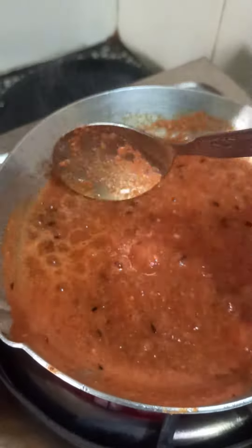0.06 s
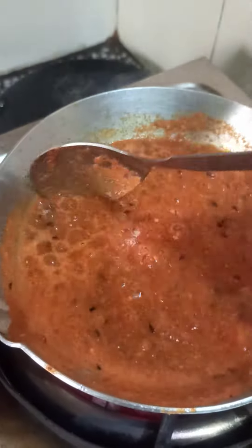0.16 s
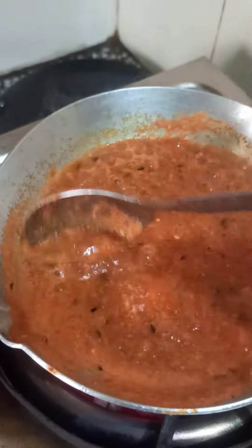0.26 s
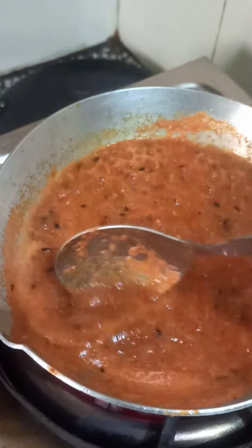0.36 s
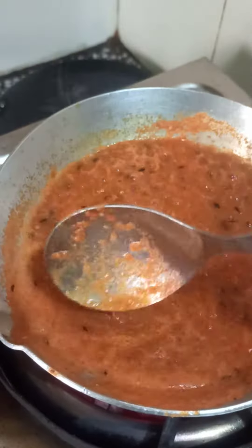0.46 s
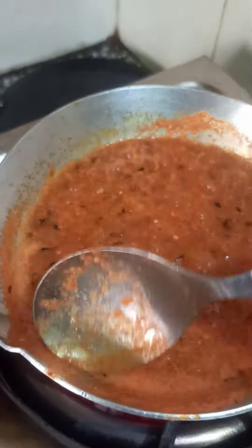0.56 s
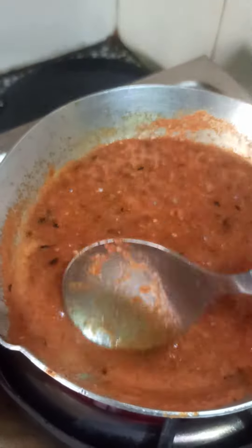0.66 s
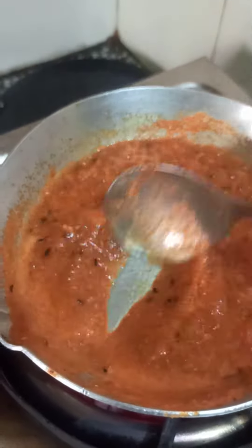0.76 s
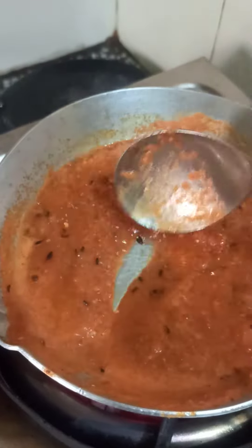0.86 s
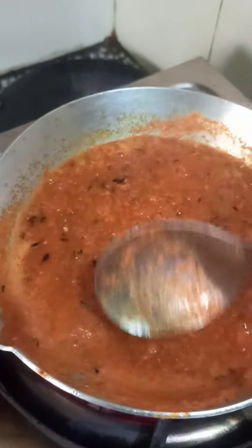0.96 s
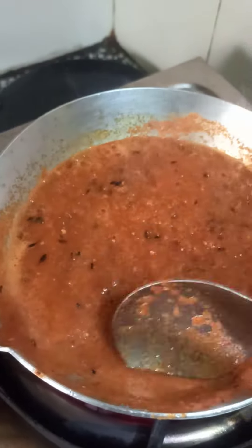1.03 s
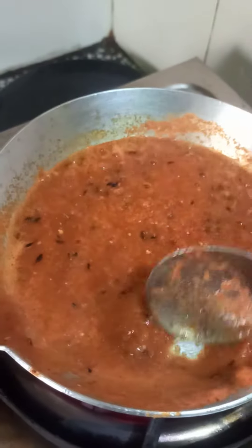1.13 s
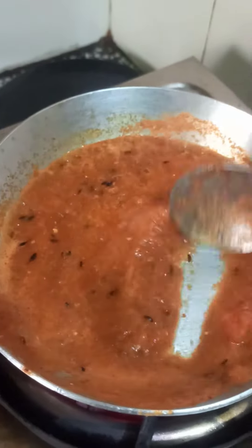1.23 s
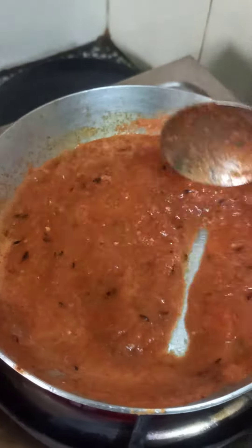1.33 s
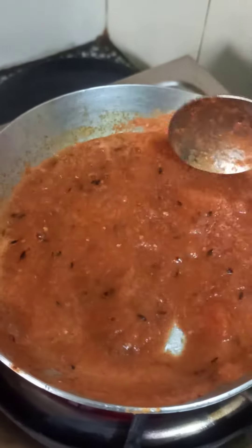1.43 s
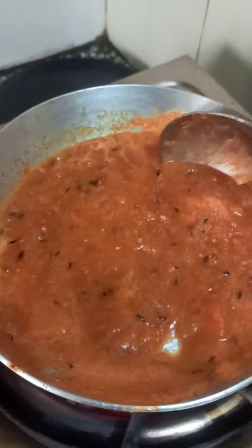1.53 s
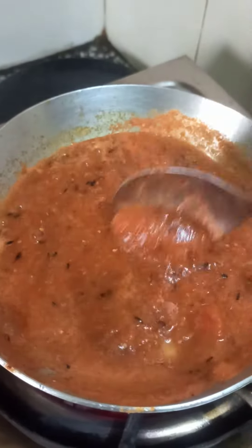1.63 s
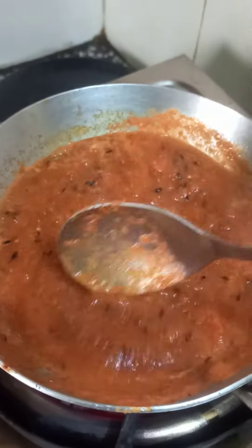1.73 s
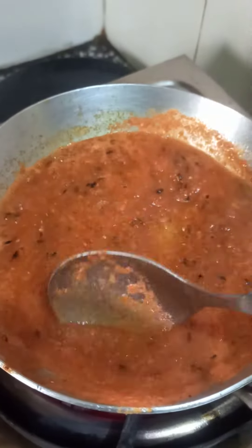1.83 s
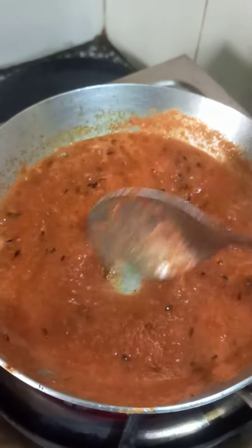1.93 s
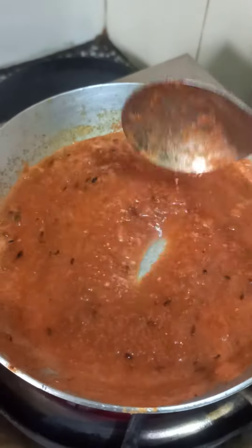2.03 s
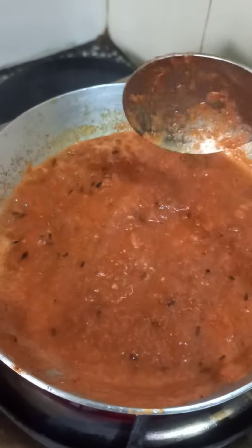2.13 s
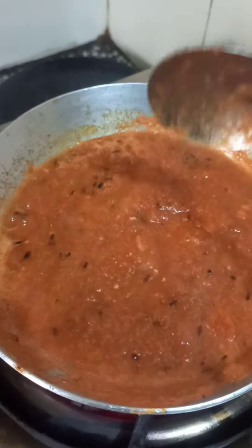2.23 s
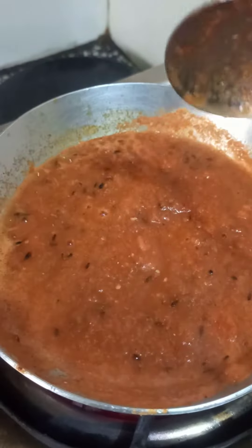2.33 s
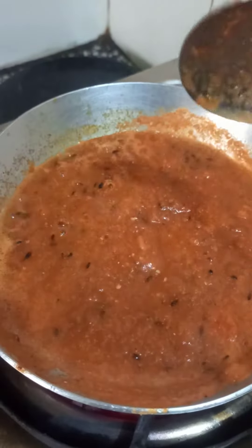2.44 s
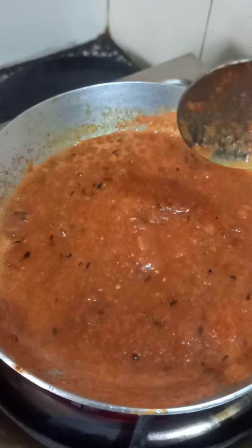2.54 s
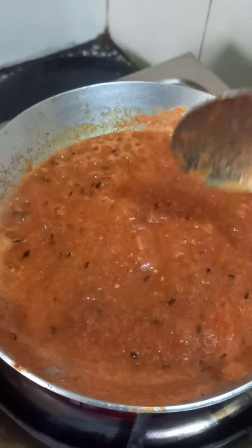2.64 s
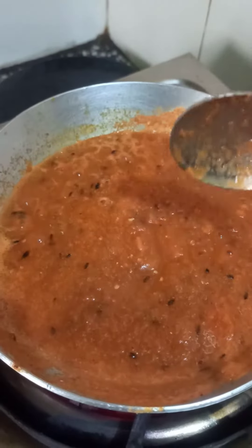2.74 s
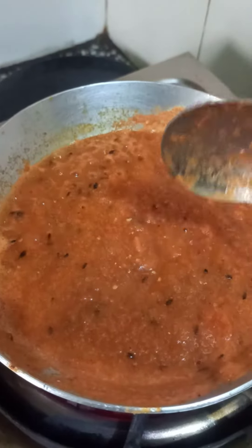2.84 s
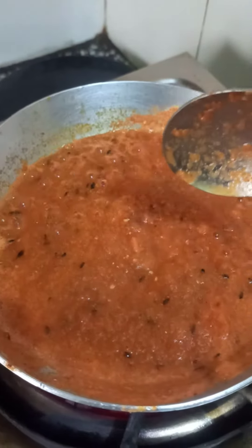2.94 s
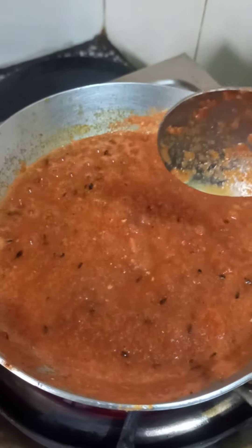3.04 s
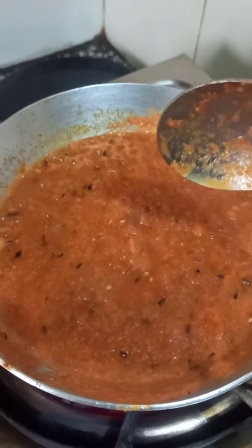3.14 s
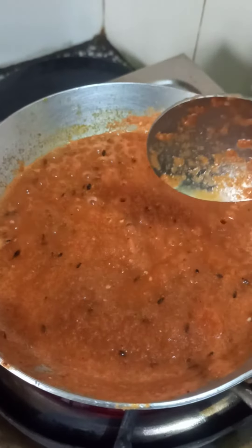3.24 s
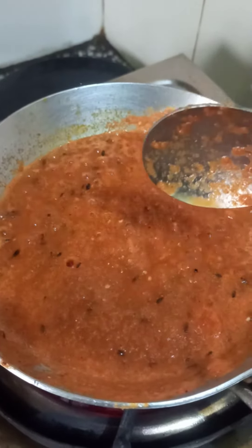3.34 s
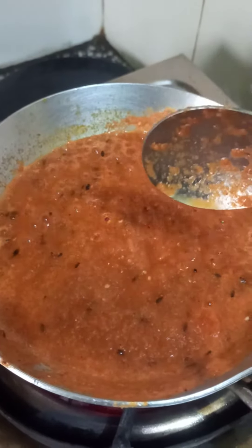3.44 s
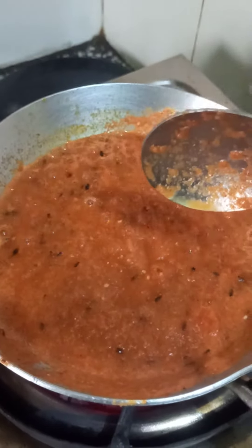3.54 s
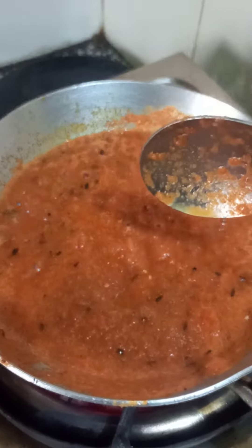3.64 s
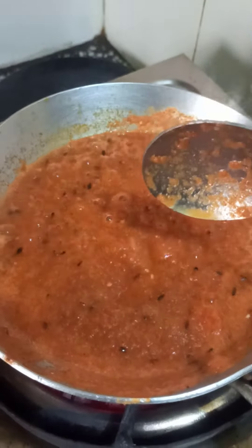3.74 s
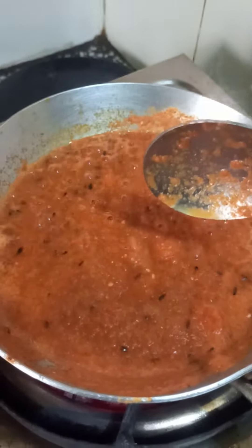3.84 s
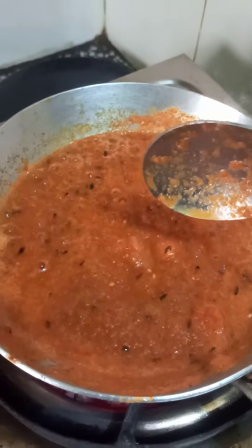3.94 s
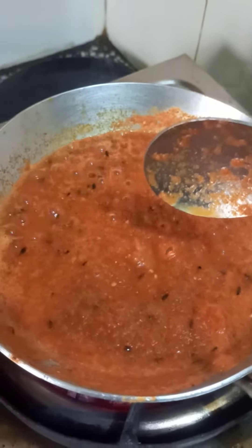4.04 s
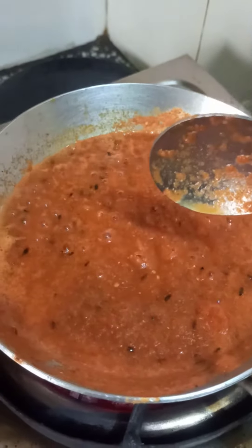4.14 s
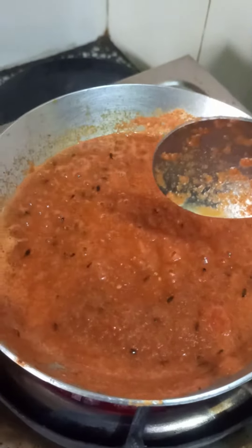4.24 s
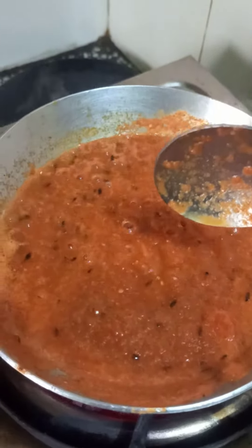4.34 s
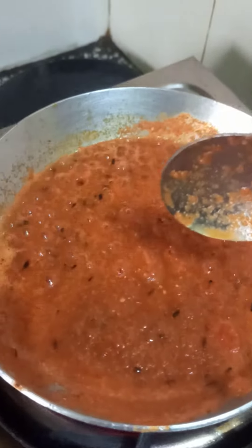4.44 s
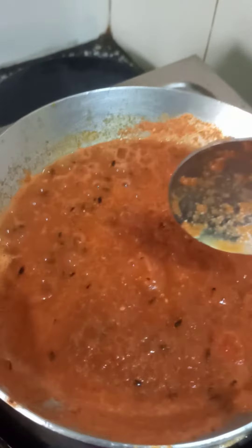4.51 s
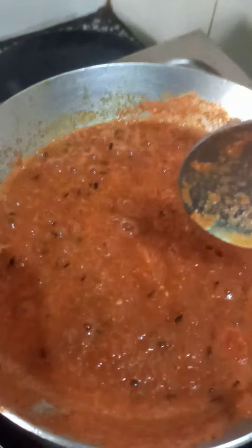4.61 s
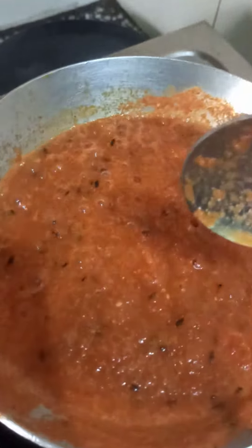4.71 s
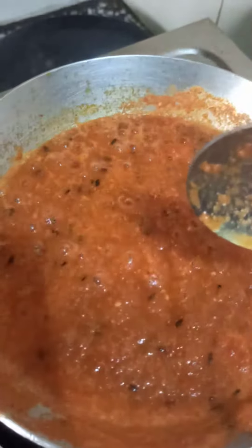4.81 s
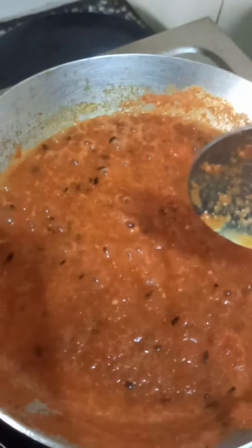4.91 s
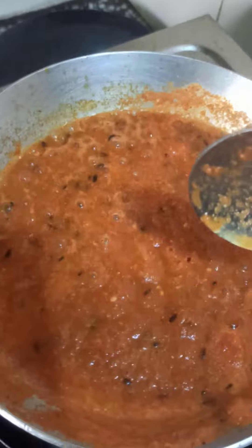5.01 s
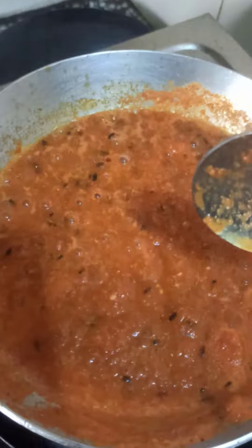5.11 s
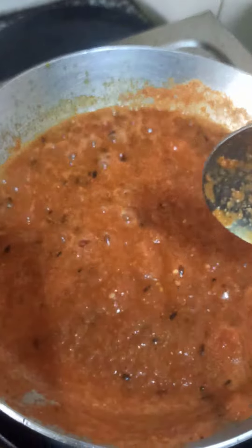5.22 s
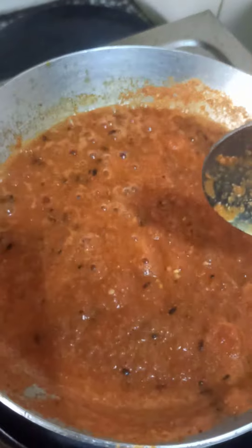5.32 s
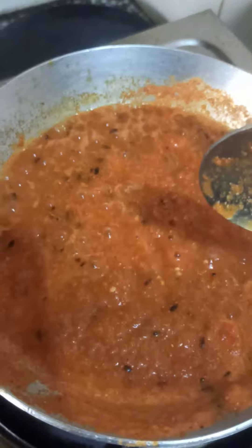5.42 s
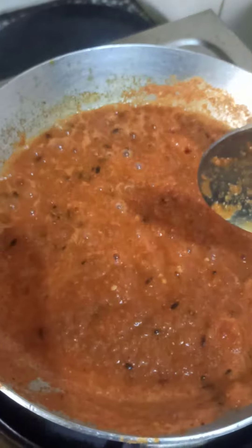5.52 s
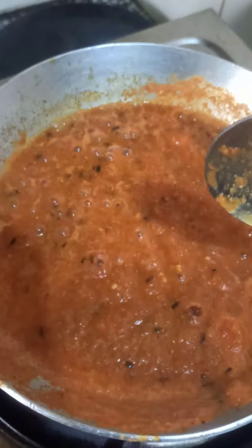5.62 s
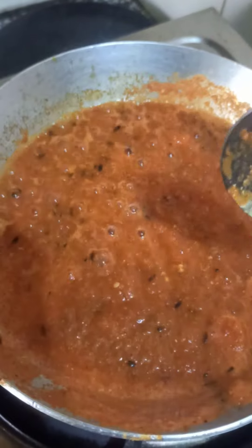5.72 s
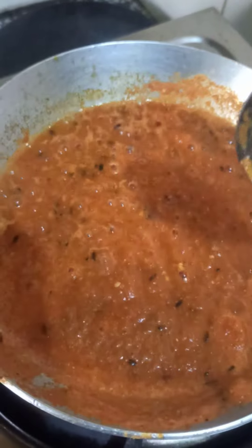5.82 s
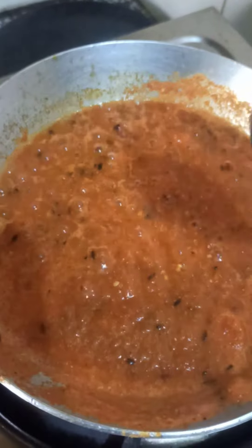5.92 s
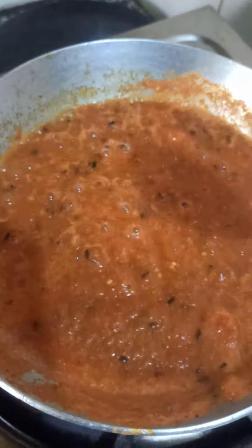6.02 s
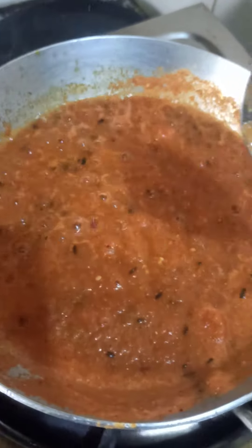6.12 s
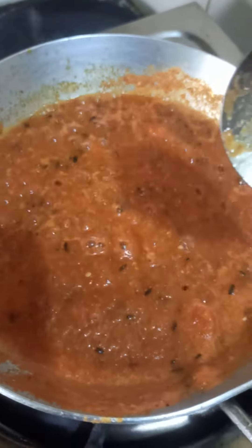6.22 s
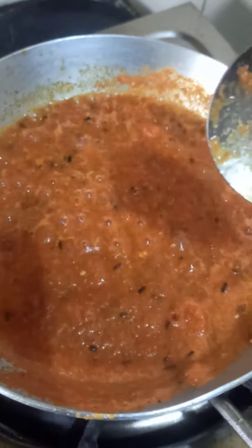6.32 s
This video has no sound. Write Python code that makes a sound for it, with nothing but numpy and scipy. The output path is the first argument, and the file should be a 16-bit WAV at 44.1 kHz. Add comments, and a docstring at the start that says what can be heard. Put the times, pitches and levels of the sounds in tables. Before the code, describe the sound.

Close, slightly wide phone pickup above a stove in a small tiled kitchen with a very short tail. From the start a soft bubbling fizz and low wavering gas flame. At about 0.1 s a dull, muffled spoon touch and a light drag through thick paste. Sharp steel clacks with hollow pan thuds follow at 0.53, 0.97, 1.43 and 1.78 s, each leading into a short gritty, bright scrape that ends abruptly; the one near 1 s cracks hardest, and the last thuds deepest. Faint low pan bumps fill the gaps. By 2 s stirring is over and the level drops far down. A thin sizzle remains with scattered snaps and tiny plops, sparse until 3 s, then steadily busier; from 4.3 to 6 s it crackles densely with brighter pops. Near the end, a faint low pan swell and a tiny spoon knock at 6.35 s.

```python
"""A steel spoon knocks in a thin pan and drags five times through thick paste: short cracks over thuds, gritty rasps.
Knocks, drags, soft low pushes and bubbles drive the pan, a bank of decaying modes.
The paste simmers: it calms, then picks up again, as dense random clicks with louder pops, a bright snap over a plop.
Below lie a gas flame, wavering coloured noise, and a tiled kitchen's short diffuse tail.
All is heard by a phone with two microphone ports held above the stove."""
import sys
import numpy as np
from scipy import signal
from scipy.fft import rfft, irfft, next_fast_len
from scipy.io import wavfile
from scipy.ndimage import uniform_filter1d

SR = 44100
rng = np.random.default_rng(int(sys.argv[2]) if len(sys.argv) > 2 else 0)


def digitize_waveform(pressure):
    """Quantize a signal to 16-bit integers and store it at the path in sys.argv[1].

    Rows of a 2-D input are taken as channels; values are limited to [-1, 1].
    """
    field = np.atleast_2d(pressure).T
    bounded = np.clip(field, -1, 1)
    quanta = np.round(bounded * 32767).astype(np.int16)
    wavfile.write(sys.argv[1], SR, quanta)


N = 280917
TIME = np.arange(N) / SR
PORT_LAG_S = 0.00012
GRIND_PER_S, GRIND_SPREAD_DB = 1500, 2.4  # slips of the spoon edge on the metal

# spoon drags over the bottom: (full pressure [s], lift [s], relative grind into pan [dB], grind lean [dB/octave],
# relative rasp [dB], rasp brightness [dB], rasp swell [dB/s], rasp fall [dB/s])
STROKE_TABLE = [(0.205, 0.27, -42, 0.5, -37, -4.5, 190, 334),
                (0.659, 0.682, -36.5, -5, -34.5, 6.5, 209, 354),
                (1.108, 1.177, -40.5, -3.5, -39, 8, 200, 503),
                (1.521, 1.561, -34, -0.5, -31, -2.5, 265, 372), (1.836, 1.881, -35, -6, -32, 0.5, 146, 349)]


def undb(db):
    """Amplitude ratio of a level in dB."""
    return 10 ** (np.asarray(db) / 20)


def unit(x):
    """Scales to rms 1 over the whole array."""
    return x / np.sqrt(np.mean(x ** 2))


def level_curve(table):
    """(time [s], level [dB]) joined by straight lines."""
    s, level_db = np.transpose(table)
    return np.interp(TIME, s, level_db)


def colour(x, points, size=2048):
    """Causal filter with the given (frequency [Hz], gain [dB]), from the folded cepstrum."""
    hz, db = np.transpose(points)
    grid_hz = np.maximum(np.arange(size // 2 + 1) * SR / size, 1)
    log_gain = np.interp(np.log(grid_hz), np.log(hz), db) * np.log(10) / 20
    cepstrum = irfft(log_gain)
    cepstrum[1:size // 2] *= 2
    cepstrum[size // 2 + 1:] = 0
    response = irfft(np.exp(rfft(cepstrum)))
    filtered = signal.fftconvolve(np.atleast_2d(x), response[None], axes=1)
    return filtered[:, :N].reshape(np.shape(x))


def tilt(x, db, pivot_hz):
    """Leans the spectrum: the part below the pivot loses db, the part above gains it."""
    low = signal.lfilter(*signal.butter(1, pivot_hz, fs=SR), x)
    return low * undb(-db) + (x - low) * undb(db)


def walk(rate_hz):
    """Random levels held 1 / rate_hz seconds and smoothed twice; rms 1."""
    hold = int(SR / rate_hz)
    steps = np.repeat(rng.standard_normal(N // hold + 1), hold)
    return unit(uniform_filter1d(uniform_filter1d(steps, hold), hold)[:N])


def grains(rate_per_s, spread_db):
    """Random clicks, a few much larger than the rest; rms 1."""
    there = rng.random(N) < rate_per_s / SR
    size = np.minimum(rng.exponential(size=N), 4.5)
    return unit(there * rng.standard_normal(N) * undb(spread_db * size))


def particles(sizes, flicker_hz):
    """Each size of particle clicks in its own band and flickers on its own."""
    out = 0
    for low_hz, high_hz, rate_per_s, spread_db, flicker_db in sizes:
        band = signal.butter(2, [low_hz, high_hz], "bandpass", fs=SR, output="sos")
        clicks = grains(rate_per_s, spread_db) * undb(flicker_db * walk(flicker_hz))
        out = out + signal.sosfilt(band, clicks)
    return out


def bursts(times_s, peak_db, hz, cycles, noisy, tail_s):
    """A few cycles that swell fast and die at each time, with a short splash of noise."""
    out, t = np.zeros(N + 4096), np.arange(2048) / SR
    noisy, cycles = np.broadcast_to(noisy, len(times_s)), np.broadcast_to(cycles, len(times_s))
    noises = rng.standard_normal((len(times_s), 2048))
    for s, db, f, turns, share, noise in zip(times_s, peak_db, hz, cycles, noisy, noises):
        age = t * f / turns
        ring = np.sin(2 * np.pi * f * t) * age * np.exp(1 - age)
        splash = share * noise * np.minimum(age, 1) * np.exp(-t / tail_s)
        out[int(s * SR):][:2048] += undb(db) * (ring + splash)
    return out[:N]


def ports(x, balance_db=0., lag_s=PORT_LAG_S):
    """The left port is nearer the pan: earlier, and coloured differently from the right."""
    # (frequency [Hz], left minus right [dB])
    port_balance = [(100, -7.5), (200, 18.5), (380, -13.5), (700, 2.5), (1290, 4), (2400, 4.5), (4400, 1.5),
                    (8100, 5.5), (15000, 1)]
    size = next_fast_len(N)
    delay = np.exp(-2j * np.pi * np.fft.rfftfreq(size, 1 / SR) * lag_s)
    late = irfft(rfft(x, size) * delay, size)[:N]
    left = colour(x, [(f, db / 2) for f, db in port_balance])
    right = colour(late, [(f, -db / 2) for f, db in port_balance])
    return np.array([left * undb(balance_db / 2), right * undb(-balance_db / 2)])


def pops(simmer_db):
    """Loud bursts and a chance scatter of smaller ones: a bright snap over a low plop."""
    # bubbles that burst louder: (time [s], relative snap [dB], relative plop [dB], plop pitch [Hz])
    loud_pops = [(2.0373, -42, -53, 506), (2.1772, -44, -74, 517), (2.401, -38.5, -48, 937),
                 (2.587, -54, -51, 880), (2.722, -45, -52, 1250), (3.369, -46, -50, 970),
                 (3.514, -44, -49, 1250), (3.649, -47, -54, 800), (3.712, -44, -68, 800),
                 (4.241, -53, -47.5, 1300), (4.434, -53, -51, 1540), (4.535, -50, -54, 1260),
                 (4.885, -48, -49, 756), (4.947, -46, -47, 1000), (4.955, -48, -49, 1300),
                 (4.967, -50, -55, 890), (3.635, -44, -49, 1110), (5.006, -51, -53, 2030),
                 (5.09, -40, -53, 870), (5.141, -45, -54, 1280), (5.247, -38, -51, 865),
                 (5.328, -43, -49, 790), (5.518, -50, -44.5, 1290), (6.007, -53, -51, 1280),
                 (6.035, -52, -51, 970), (6.068, -56, -55, 600), (6.26, -48, -47.5, 815),
                 (2.6002, -45, -49, 950), (3.08, -40, -50, 1320), (3.2181, -38, -58, 1650),
                 (3.417, -41, -53, 900), (3.4898, -44, -52, 1280), (3.6277, -41, -46, 765),
                 (4.0233, -39, -53, 1200), (4.0759, -38, -48, 990), (4.35, -39, -53.5, 516),
                 (4.4895, -39, -51, 1230), (4.6798, -38, -64, 810), (4.7743, -40, -45.5, 1330),
                 (4.8, -37, -56, 1300), (4.8434, -51, -44.5, 790), (4.8679, -38.5, -60, 510),
                 (4.931, -48, -45.5, 850), (4.9366, -40, -48, 700), (4.9851, -47, -61, 1320),
                 (5.0727, -39, -67, 875), (5.1625, -37, -47, 1310), (5.301, -35, -71, 1310),
                 (5.38, -53, -55, 1090), (5.41, -49, -49, 1290), (5.446, -49, -48, 880),
                 (5.598, -53, -46.5, 1000), (5.748, -43, -44, 1250), (5.6149, -35, -65, 797),
                 (5.6534, -36, -70, 501), (5.7748, -41, -54, 725), (5.903, -37, -61, 764),
                 (6.02, -40, -65, 794), (6.335, -38, -64, 795)]
    small_per_s, small_spread_db = 70, 1.8
    small_snap_db, small_plop_db = 2.5, -13  # offsets from the simmer, ahead of the random size
    plop_low_hz, plop_high_hz = 490, 1850
    snap_hz, snap_spread = 7580, 0.063

    when, size, low, pitch = rng.random((int(small_per_s * N / SR), 4)).T
    small_db = simmer_db[(when * N).astype(int)] - small_spread_db * np.log(1 - .93 * size)
    small_hz = plop_low_hz * (plop_high_hz / plop_low_hz) ** pitch
    small = [when * N / SR, small_db + small_snap_db, small_db + small_plop_db - 8 * low, small_hz]
    s, snap_db, plop_db, plop_hz = np.concatenate([np.transpose(loud_pops), small], axis=1)
    hz = snap_hz * (1 + snap_spread * rng.standard_normal(len(s)))
    snaps = bursts(s, snap_db, hz, 4.1, 0.89, 0.008) * undb(-6.5)
    plops = bursts(s, plop_db, plop_hz, 1.22, .3, 0.0055)
    return snaps, plops


def paste():
    """Steam bubbles of all sizes burst by the thousand, near and far side; they also drum on the pan."""
    # simmer, ahead of the air and drum gains: (time [s], level [dB])
    simmer = [(0.0, -47), (0.5, -51), (0.8, -56), (2.05, -57.5), (2.64, -56), (4.45, -53.5), (5.18, -51.5),
              (6.37, -51.5)]
    # bubble sizes: (lowest [Hz], highest [Hz], bursts [1/s], size spread [dB], flicker [dB])
    bubble_sizes = [(100, 1000, 800, 2.2, 1.2), (1000, 3000, 1400, 2.5, 1.2), (3000, 9500, 2500, 3.0, 1.8),
                    (9500, 18000, 2200, 3.3, 1.8)]
    # colour of the bursts: (frequency [Hz], gain [dB])
    fizz = [(200, -20), (400, -18), (780, -1), (1050, -7.5), (1300, 0), (2050, -4), (2800, -8.5),
            (4600, -3.5), (7500, -3.5), (13000, 4.5)]
    drum_per_s, drum_spread_db = 1500, 2.2

    simmer_db = level_curve(simmer)
    boil = undb(simmer_db + .9 * walk(45) + .5 * walk(5))
    air = 0
    for lag_s in (.00018, .00027):
        side = colour(particles(bubble_sizes, 40) * boil, fizz) * undb(3.0)
        air = air + ports(side, 0., lag_s)
    snaps, plops = pops(simmer_db)
    drumming = grains(drum_per_s, drum_spread_db) * boil * undb(-39.0)
    plop_push = np.abs(plops) * undb(-33.5)
    return air + ports(snaps + plops), drumming + plop_push


def soft_pushes(hz):
    """Soft low pushes into the pan, most during the drags, the last four a low swell near 165 Hz."""
    # (time [s], relative push [dB], favoured pitch [Hz])
    push_table = [(.064, -32, 330), (.073, -24, 215), (.087, -29, 440), (.105, -28.5, 416),
                  (0.116, -45, 320), (.16, -41, 440), (.189, -34, 480), (.228, -37, 430), (.251, -35, 440),
                  (.282, -35.5, 435), (.537, -31, 435), (.546, -23, 440), (.558, -17.5, 363),
                  (0.568, -24, 395), (.583, -25, 430), (.604, -21, 695), (.618, -16, 403), (.628, -19, 435),
                  (.642, -23.5, 328), (.727, -35.5, 398), (.984, -28, 440), (.992, -19.5, 435),
                  (1.002, -27, 446), (1.024, -21, 338), (1.015, -23, 332), (1.046, -31, 328),
                  (1.075, -29, 435), (1.098, -27, 435), (1.123, -27, 437), (1.135, -32, 435),
                  (1.158, -32.5, 435), (1.191, -33, 435), (1.478, -21.5, 352), (1.502, -28, 410),
                  (1.52, -23.5, 423), (1.53, -29, 396.3), (1.57, -23, 346), (1.607, -40, 338),
                  (1.671, -36.5, 350), (1.791, -17, 416), (1.8, -33, 90), (1.803, -25, 435),
                  (1.824, -27, 400), (1.844, -24, 427), (1.889, -28.5, 436), (1.927, -32.5, 360),
                  (1.998, -44, 363), (2.021, -41.5, 335), (6.12, -35, 165), (6.2, -35, 165),
                  (6.315, -33, 165), (6.34, -31, 166)]
    push_s, loss_db_per_octave = 0.0009, 30.5  # loss away from the favoured pitch
    s, db, pitch_hz = np.transpose(push_table)
    force = np.zeros(N)
    force[(s * SR).astype(int)] = undb(db - loss_db_per_octave * np.abs(np.log2(hz / pitch_hz)))
    push = signal.windows.hann(int(push_s * SR))
    return np.convolve(force, push / push.sum())[:N]


def pan(force, lean_db_per_octave):
    """Decaying modes: the contact place sets each mode's force; each has its own port balance."""
    # (frequency [Hz], gain [dB], full t60 [s], left minus right [dB])
    pan_modes = [(91.6, -23.5, .3, 4), (163.7, -20, 0.55, 0.5), (217.5, -16, 0.14, 9),
                 (317.2, -9, 0.3, 12.5), (308.5, -4, 0.091, -14), (350.7, -6.5, 0.25, -15.5),
                 (398.6, -2.5, 0.071, 7), (436.2, 3, 0.17, -2.5), (438, -2.5, 0.087, -3),
                 (470, -6, 0.065, -18.5), (528, -6.5, 0.14, 1.5), (602, -8.5, 0.054, 18.5),
                 (755, -6, 0.099, 4), (827, -3.5, 0.049, 1), (946, 1, 0.046, 1), (1006, -3.5, 0.038, 8.5),
                 (1249, -5, 0.033, 8), (1214, -15, 0.02, 21), (1410, -38, 0.013, 8), (1770, -23.5, 0.23, 2),
                 (2038, -6, 0.04, -11.5), (2410, -7, 0.0065, -21.5)]
    pushed_ring, pushed_db = 0.46, 2.5  # soft pushes ring for this share of the full t60

    out = np.zeros((2, N))
    for k, (hz, db, t60_s, balance_db) in enumerate(pan_modes):
        pole = np.exp(2j * np.pi * hz / SR - np.log(1000) / (t60_s * SR))
        octaves = np.clip(np.log2(hz / 380), -1, 1)
        share = undb(lean_db_per_octave * octaves + 2.2 * walk(20))
        struck = signal.lfilter([1], [1, -pole], force * share)
        short_pole = pole * np.abs(pole) ** (1 / pushed_ring - 1)
        pushed = signal.lfilter([1], [1, -short_pole], soft_pushes(hz)) * undb(pushed_db)
        ring = (struck + pushed) * (-1) ** k  # neighbouring modes move in opposite senses
        lag = np.exp(-2j * np.pi * hz * PORT_LAG_S)
        left, right = undb(balance_db / 2) * ring.imag, undb(-balance_db / 2) * (ring * lag).imag
        out += undb(db) * np.array([left, right])
    return signal.lfilter(*signal.butter(2, 80, "high", fs=SR), out)  # a small pan radiates no deep bass


def flame():
    """Gas flame and room rumble: a low wavering roar, partly alike at both ports."""
    # ahead of a fixed gain: (time [s], level [dB])
    flame_level = [(0.0, -57), (2.2, -60), (6.0, -60.5), (6.37, -56)]
    # (frequency [Hz], gain [dB])
    roar = [(30, -4), (55, -8), (90, 9), (130, 6), (200, 1.5), (320, 1.5), (500, -8), (1000, -15),
            (4000, -20.5)]
    mid, side = unit(colour(rng.standard_normal((2, N)), roar))
    gain = undb(level_curve(flame_level) + 2.0 + 0.32 * walk(26.0))
    return gain * np.array([0.87 * (mid + 0.91 * side), mid - 0.25 * side])


def kitchen(x):
    """Tiles and worktop return a short diffuse tail, thin in the bass, unrelated at the two ports."""
    t60_s, tail_db = 0.17, -6.5
    t = np.arange(SR // 2) / SR
    decay = np.exp(-np.log(1000) * t / t60_s) * (t > .0015)
    tail = rng.standard_normal((2, len(t))) * decay
    tail = signal.lfilter(*signal.butter(1, 900, "high", fs=SR), tail)
    tail /= np.sqrt(np.sum(tail ** 2, axis=1, keepdims=True))
    return undb(tail_db) * signal.fftconvolve(x, tail, axes=1)[:, :N]


def pressure(swell_db_s, fall_db_s, peak_db):
    """One gain row a stroke: rises to full pressure, holds, falls after the lift."""
    full_s, lift_s = np.transpose(STROKE_TABLE)[:2, :, None]
    rise_db = swell_db_s * np.maximum(full_s - TIME, 0)
    fall_db = fall_db_s * np.maximum(TIME - lift_s, 0)
    return undb(peak_db[:, None] - rise_db - fall_db)


def bowl(x):
    """The rasp rings the spoon bowl; each resonance comes and goes as grip and angle change."""
    # (frequency [Hz], width [Hz], relative level [dB])
    bowl_modes = [(1207, 47, 5), (3880, 140, -6), (4500, 400, -18.5), (5640, 89, -11), (6530, 23, 6.5),
                  (7200, 51, 0.5), (7380, 130, 8.5), (7950, 91, -10.5)]
    ring = 0
    for hz, width_hz, db in bowl_modes:
        grip = undb(db + 4.5 * walk(11.4))
        ring = ring + grip * signal.lfilter(*signal.iirpeak(hz, hz / width_hz, fs=SR), x)
    return x + undb(-10) * unit(ring)


def sliding(hz):
    """Grit in a band, 175 Hz wide, whose centre follows hz."""
    low = signal.butter(2, 175 / 2, fs=SR)
    a, b = (signal.lfilter(*low, grains(GRIND_PER_S, GRIND_SPREAD_DB)) for _ in range(2))
    carrier = np.exp(2j * np.pi * np.cumsum(hz) / SR)
    return unit(((a + 1j * b) * carrier).real)


def spoon():
    """Knocks crack and thud, drags chatter; returns sound in the air, force on the pan and its lean."""
    # landings: (first touch [s], relative crack [dB], crack pitch [Hz], crack length [cycles],
    # relative thud into pan [dB], thud lean [dB/octave], left minus right ahead of an offset [dB],
    # clatter share [0-1], relative skid into pan [dB], skid lean [dB/octave])
    knocks = [(0.062, -46, 900, 0.36, -32.5, -12, -17, 0.4, -29.5, -6),
              (0.097, -49, 2140, 0.5, -39, -12, -5, 0.35, -38, -12.5),
              (0.427, -48, 1800, 0.43, -46, 0.5, -23.5, 0.4, -54, -3),
              (0.529, -3.5, 3740, 0.26, -31, 6.5, 7, 0.22, -25, 0.5),
              (0.602, -17.5, 780, 0.72, -27.5, 0, 1.5, 0.83, -30, 1.5),
              (0.974, -1.5, 3820, 0.6, -25.5, .6, -3, 0, -24.5, 2),
              (1.028, -20, 2950, 0.22, -59, 7, -3, 0.66, -30, -1),
              (1.287, -45.5, 1730, .4, -61, -1, -8, 0.8, -47, -12),
              (1.297, -53, 1500, 0.35, -50, -5, -6, 0.7, -51.5, -11),
              (1.434, -16, 1170, 0.41, -25.5, 2.5, 2, 0.42, -32, 3),
              (1.783, -8, 4150, 0.28, -18.5, -1.5, 1.5, 0.73, -25.5, 0.5),
              (6.355, -39.5, 1500, 0.35, -52.5, 7, -4, 0.9, -53, -5)]
    # grit, coarse to fine: (lowest [Hz], highest [Hz], slips [1/s], size spread [dB], flicker [dB])
    grit_sizes = [(202, 1190, 1800, 2.4, 2.5), (1190, 2800, 2200, 3.0, 3.0), (2800, 6000, 2500, 3.2, 2.8),
                  (6000, 16000, 3000, 3.2, 2.2)]
    # (frequency [Hz], gain [dB])
    rasp_colour = [(300, -12), (700, -6), (1300, -1.5), (2000, 1), (2900, -6.5), (3800, -5), (5000, 3),
                   (7000, -7), (13000, -1.5)]
    # bands that slide as the spoon turns, one row a stroke, three bands in turn:
    # (centre at full pressure [Hz], centre at lift [Hz], level over the rasp drive [dB])
    scrape = [(1100, 1100, -8.5, 2200, 2000, -21, 500, 480, -12),
              (1720, 1650, -5.5, 2300, 2350, -11, 10000, 7200, -9),
              (2065, 2100, -4, 3800, 2800, -10, 8200, 6750, -15),
              (1248, 870, -5, 1900, 1850, -9.5, 1000, 1100, -6.5),
              (1220, 1000, -5, 1900, 2200, -12.5, 8200, 7000, -14)]
    contact_s = .0017  # first touch to crack
    skid_rise_s, skid_fall_db_s = 0.011, 196
    skid_rasp_db, skid_rasp_fall_db_s, skid_bright_db = -11.5, 852, 0.84
    grind_swell_db_s, grind_fall_db_s = 84, 182
    settle_s = 0.09  # a drag starts dull and bites as the pressure builds
    lifted_lean = -4.5  # dB/octave, near the dull middle of the pan
    thump_hz, thump_db = 70, 18

    (s, crack_db, crack_hz, cycles, thud_db, thud_lean,
     balance_db, clatter, skid_db, skid_lean) = np.transpose(knocks)
    (full_s, lift_s, grind_db, grind_lean,
     rasp_db, bright_db, swell_db_s, fall_db_s) = np.transpose(STROKE_TABLE)

    # skid after each knock
    last = np.clip(np.searchsorted(s, TIME) - 1, 0, None)
    since = TIME - s[last] - contact_s
    skid = np.clip(since / skid_rise_s, 0, 1) * undb(skid_db[last] - skid_fall_db_s * since)
    skid_rasp = (since > 0) * undb(crack_db[last] + skid_rasp_db - skid_rasp_fall_db_s * since)

    # a drag starts at a landing
    down = np.array([s[s < f].max() for f in full_s])[:, None] < TIME
    drags = down * pressure(grind_swell_db_s, grind_fall_db_s, grind_db)
    drag_rasp = (down * pressure(swell_db_s[:, None], fall_db_s[:, None], rasp_db)).sum(axis=0)
    stroke = drags.argmax(axis=0)
    drag = drags.sum(axis=0)

    # lean of the force over the pan modes
    drag_lean = np.where(TIME > lift_s[stroke] + .03, lifted_lean, grind_lean[stroke])
    unsettled = np.clip((full_s[stroke] - TIME) / settle_s, 0, 1)
    drag_lean = drag_lean + (lifted_lean - drag_lean) * unsettled
    lean = np.where(skid > drag, skid_lean[last], drag_lean) * (skid + drag > undb(-62))
    lean = np.where((since < contact_s) & (TIME > s[0]), thud_lean[last], lean)

    # the edge touches in two places, heard from slightly different angles
    turned = np.clip((TIME - full_s[stroke]) / (lift_s - full_s)[stroke], -1, 1.5)
    bands = np.reshape(scrape, (-1, 3, 3))[stroke].T
    bright = np.where(skid_rasp > drag_rasp, skid_bright_db, bright_db[stroke])
    chatter = undb(1.3 * walk(60) + 2.0 * walk(350))  # uneven stick and slip
    rasp = 0
    for lag_s in (.00008, .00030):
        grit = bowl(unit(colour(particles(grit_sizes, 30.0), rasp_colour)))
        edge = tilt(grit, bright, 1700) * np.hypot(skid_rasp, drag_rasp)
        for start_hz, end_hz, db in zip(*bands):
            edge = edge + sliding(start_hz + (end_hz - start_hz) * turned) * undb(db) * drag_rasp
        rasp = rasp + ports(edge * chatter * undb(-5.5), -2.5, lag_s)

    crack = bursts(s + contact_s, crack_db, crack_hz, np.maximum(cycles, .2), clatter, 0.0026)
    crack = signal.lfilter(*signal.butter(2, 220, "high", fs=SR), crack)
    side_db = balance_db[np.clip(np.searchsorted(s, TIME + .005) - 1, 0, None)]

    blows = np.zeros(N + SR)
    blows[((s + contact_s) * SR).astype(int)] = undb(thud_db)
    blows = np.convolve(blows, signal.windows.hann(16))[:N] * undb(-19.5)  # a short hard push
    grind = grains(GRIND_PER_S, GRIND_SPREAD_DB) * chatter * np.hypot(skid, drag) * undb(-29.0)

    # each landing also shakes the stove
    thump = signal.lfilter(*signal.butter(2, thump_hz, fs=SR), blows)
    thump = thump * undb(thump_db + np.array([[2.5], [-2.5]]))
    return ports(crack, side_db + 1.0, .00004) + rasp + thump, blows + grind, lean


def scene():
    """Spoon, paste and pan with their kitchen tail, over the flame."""
    steel, spoon_force, lean = spoon()
    bubbles, drumming = paste()
    near = steel + bubbles + pan(spoon_force + drumming, lean)
    return near + kitchen(near) + flame()


def record(dry):
    """Overall tone: a lift near 6.5 kHz, a deep gap from 9 to 11.5 kHz, rounded peaks, then a steep top cut."""
    # weak deep bass, a dip, a lift, a deep gap: (frequency [Hz], gain [dB])
    overall_tone = [(20, -16), (60, -3), (110, 0.5), (4300, 2), (5200, -5), (5900, -2.5), (6500, 6),
                    (8300, 3), (8750, -13), (9200, -27), (11300, -38.5), (11700, -11), (15700, -12)]
    ceiling, top_hz = .9, 15750
    rounded = ceiling * np.tanh(colour(dry, overall_tone) / ceiling)
    return signal.sosfilt(signal.ellip(10, .2, 80, top_hz, fs=SR, output="sos"), rounded)


dry = scene()
out = record(dry)
digitize_waveform(out)
```